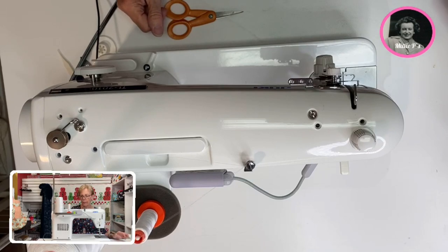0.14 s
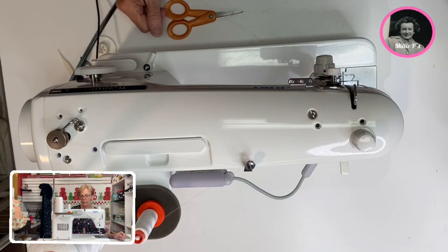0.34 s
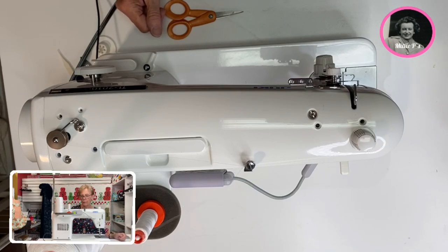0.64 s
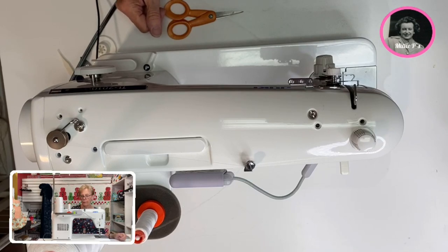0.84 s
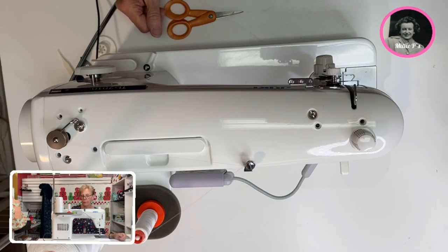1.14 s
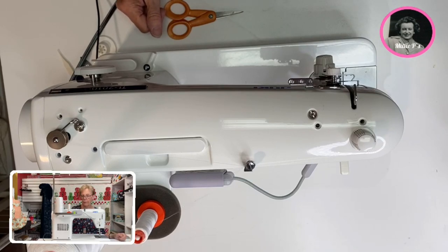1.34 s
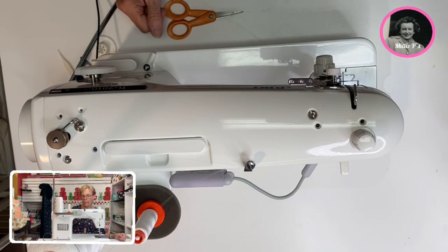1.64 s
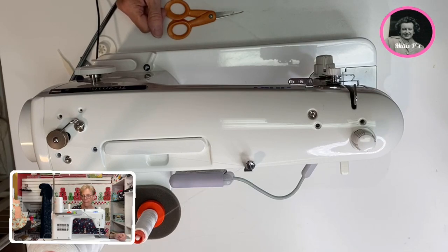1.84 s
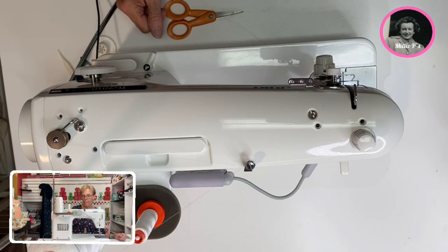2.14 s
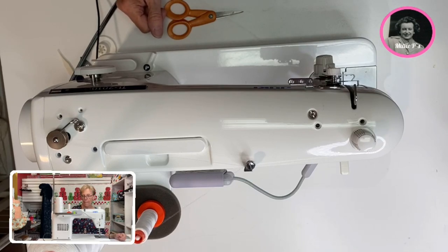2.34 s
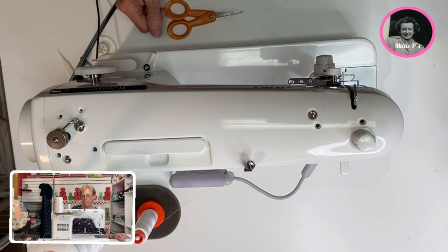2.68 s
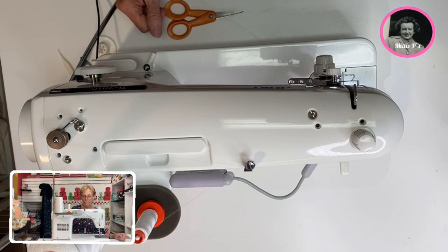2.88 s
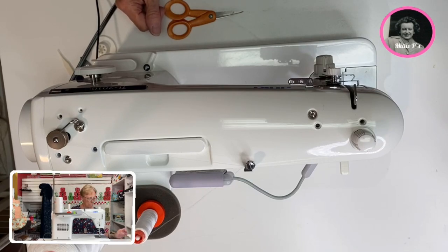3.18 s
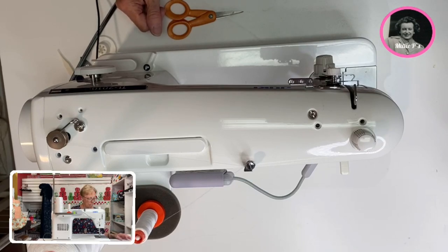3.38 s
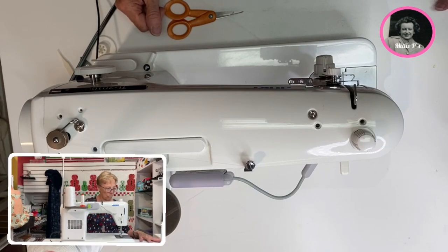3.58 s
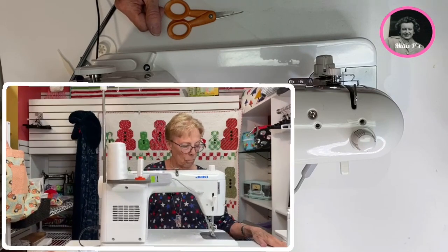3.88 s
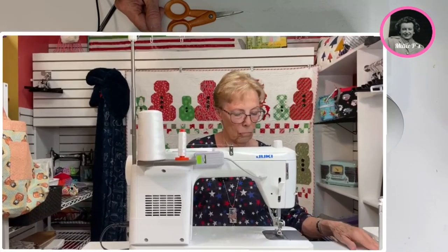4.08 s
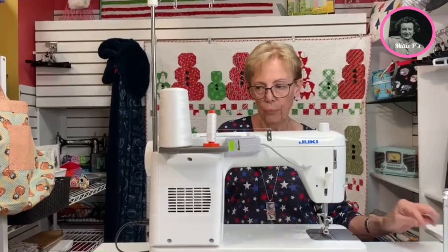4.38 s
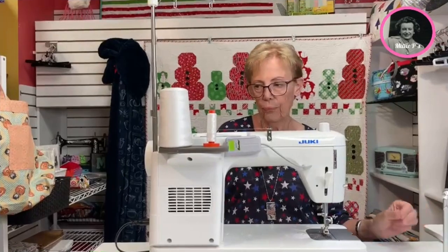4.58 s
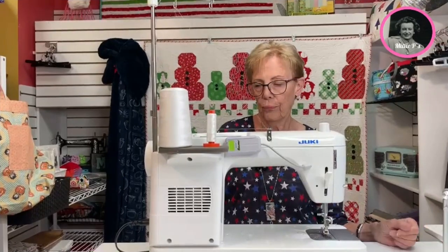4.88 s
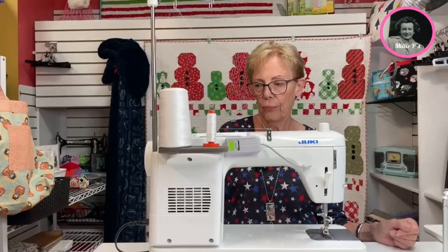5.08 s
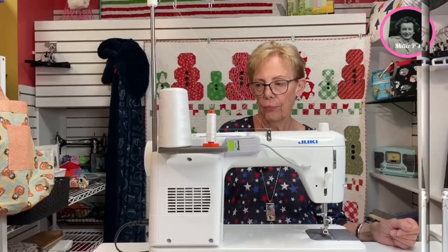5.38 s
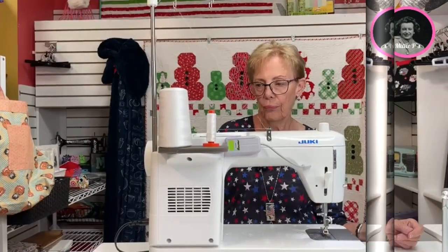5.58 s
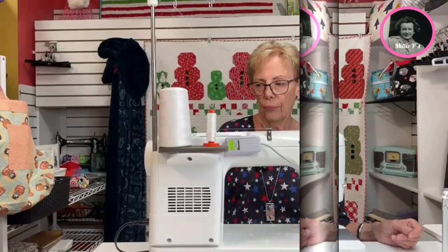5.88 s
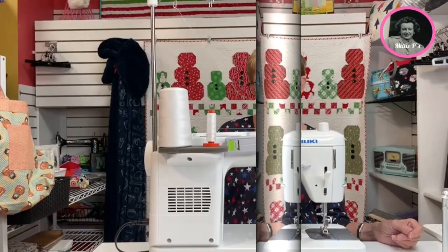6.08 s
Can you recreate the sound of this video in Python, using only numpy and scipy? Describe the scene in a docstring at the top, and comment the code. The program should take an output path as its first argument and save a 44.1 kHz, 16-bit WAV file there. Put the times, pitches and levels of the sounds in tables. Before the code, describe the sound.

Steady, nearly pure motor whine with a rough buzzing edge, fast bobbin chatter and thin scraping squeals, dipping in level at the very end.

```python
"""A sewing machine motor settles to a steady speed, its 13 pulley teeth whining, and spins a bobbin winder.
The whine is a sine; wheel and belt add side tones, stored as one wave that repeats with their full cycle.
A loose bobbin knocks on every turn: short blows make the shell ring, and bursts of noise chirp and scrape.
Shaped noise makes the whirr, the thin squeals and the low rumble; a slow sine swell makes the hum.
The whine drops at the very end; side tones, whirr, bobbin and rumble sink a little over the last second."""
import sys
import numpy as np
from scipy import signal
from scipy.fft import rfft, irfft
from scipy.io import wavfile
from scipy.ndimage import uniform_filter1d, map_coordinates

SR = 44100
rng = np.random.default_rng(int(sys.argv[2]) if len(sys.argv) > 2 else 0)


def log_audio(samples):
    """Write samples as a 16-bit WAV file to the path given in sys.argv[1]."""
    # one column per channel
    frames = np.atleast_2d(samples).T
    # limit to full scale, then quantise
    limited = np.clip(frames, -1, 1)
    pcm = np.round(limited * 32767).astype(np.int16)
    wavfile.write(sys.argv[1], SR, pcm)


N = 274346  # samples, about 6.2 s

TEETH = 13  # on the motor pulley
CYCLE = 42  # motor turns until wheel and belt are back in step
WHEEL, BELT = 7, 5  # their turns in one full cycle
MESH = TEETH * CYCLE  # teeth passing in one full cycle
STEADY_PER_S = 144.222  # motor turns per second once settled

# resonances of the machine's shell:
# (frequency [Hz], width [Hz], lift of the whirr [dB], relative strength of the ring to a knock [dB])
SHELL = [(218.4, 44, 16, -24), (340.5, 25, 8.5, -15.5), (660, 217, 13, -41), (982, 43, 16.5, -28),
         (1238, 33, 1, 0), (1464, 118, 12, -18), (1910, 293, 13.5, -37), (2104, 64, -1, -7),
         (2906, 107, 4.5, -2), (3422, 220, 6.5, -3), (3840, 400, -9, -2.5), (4790, 340, -1, -7.5),
         (5240, 210, -24, -10.5), (6630, 190, 2, -11.5), (7600, 190, 2, -52), (8410, 87, 4.5, -20),
         (9000, 150, 1, -25), (10400, 140, -19, -38), (12040, 400, 3, -35), (13000, 300, -7, -13),
         (15000, 350, -4, -26)]


def gain_of(db):
    """Turns decibels into a factor for the wave."""
    return 10 ** (np.asarray(db) / 20)


def evened(x):
    """Scales a signal to an rms (average strength) of 1."""
    return x / np.sqrt(np.mean(x ** 2) + 1e-20)


def smoothed_twice(x, size):
    """Applies a moving average of `size` samples two times."""
    return uniform_filter1d(uniform_filter1d(x, size=size), size=size)


def curve(rows):
    """Draws straight lines through a (time, value) table, one value a sample."""
    time_s, values = np.transpose(rows)
    return np.interp(np.arange(N) / SR, time_s, values)


def resonate(x, hz, width_hz):
    """Rings at one frequency: shifts it down to zero, smooths, and shifts it back."""
    turn = np.exp(2j * np.pi * np.cumsum(hz * np.ones(len(x))) / SR)
    r = np.exp(-np.pi * abs(width_hz) / SR)
    return 2 * (turn * signal.lfilter([1 - r], [1, -r], x / turn)).real


def resonate_twice(x, hz, width_hz):
    """Rings twice in a row, which cuts away more of the sound on both sides, then evens the strength."""
    return evened(resonate(resonate(x, hz, width_hz), hz, width_hz))


def speed():
    """Motor turns per second, easing down to the steady value."""
    extra_per_s, settle_s = 1.4, .45
    left = np.clip(1 - np.arange(N) / SR / settle_s, 0, 1)
    return STEADY_PER_S + extra_per_s * left ** 2


def fade_db():
    """A level that sinks evenly, in dB, over the last second or so."""
    from_s, db_per_s = 5.17, 2.5
    return -db_per_s * np.maximum(np.arange(N) / SR - from_s, 0)


def in_spell(outside_db, inside_db):
    """Gain that moves between two levels with the bobbin's bright spell, blended as power."""
    # how far the spell has come: (time [s], share [0 to 1])
    spell = [(0, 0), (2.6, 0), (3.0, 0.2), (3.3, 1), (3.65, 1), (3.95, 1), (4.2, 0.5), (4.55, 0),
             (6.22, 0.02)]
    share = np.clip(curve(spell), 0, 1)
    return np.sqrt((1 - share) * gain_of(2 * outside_db) + share * gain_of(2 * inside_db))


def shell_colour(hz):
    """Strength of the whirr at each frequency, lifted at every resonance of the shell."""
    # whirr of bearings, belt and air: (frequency [Hz], relative level [dB])
    whirr_levels = [(41, -51), (70, -12.5), (148, -19), (189, -15.5), (786, -27.5), (1240, -12),
                    (1350, -22), (1620, -18), (2330, -17), (3820, -13.5), (4380, -21.5), (15500, -38.5)]
    f, db = np.transpose(whirr_levels)
    base = gain_of(np.interp(np.log(hz + 1), np.log(f + 1), db, left=-80))
    lift = sum(gain_of(up_db) / (1 + (2 * (hz - mid) / width) ** 2) for mid, width, up_db, _ in SHELL)
    return base * (1 + lift)


def rumble(level_db=-38):
    """Slow, lumpy low noise through table and floor: random noise shaped by frequency."""
    # shape of the rumble: (frequency [Hz], relative level [dB])
    rumble_levels = [(4, -17), (9, 1), (26, -9), (33, -13.5), (60, -13), (90, -31.5), (140, -54)]
    hz = np.fft.rfftfreq(N, 1 / SR)
    f, db = np.transpose(rumble_levels)
    colour = gain_of(np.interp(np.log(hz + 1), np.log(f + 1), db, right=-120))
    noise = irfft(rfft(rng.standard_normal(N)) * colour, N)
    return gain_of(level_db + fade_db()) * evened(noise)


def hum(hz=58.5, middle_db=-50.5, swell_db=5, period_s=7.6, top_s=5.0):
    """One low sine tone that grows and sinks slowly, loudest at top_s."""
    t = np.arange(N) / SR
    db = middle_db + swell_db * np.cos(2 * np.pi * (t - top_s) / period_s)
    return gain_of(db) * np.sqrt(2) * np.sin(2 * np.pi * hz * t)


def whirr(level_db=-40, patchy_db=1.5, belt_db=0.5, wheel_db=1.3):
    """Noise through the shell, with drifting patches, throbbing as belt and wheel go round."""
    frames, hz = N // 512 + 5, np.fft.rfftfreq(2048, 1 / SR)
    real, imaginary, patches = rng.standard_normal((frames, len(hz), 3)).T
    # patches spread over neighbouring frequencies, then over time
    patches = uniform_filter1d(patches, size=30, axis=0)
    patches = evened(uniform_filter1d(patches, size=12, axis=1))
    spectrum = (real + 1j * imaginary) * shell_colour(hz)[:, None] * gain_of(patchy_db * patches)
    noise = signal.istft(spectrum, nperseg=2048, noverlap=1536)[1][:N]
    cycle_angle = 2 * np.pi * np.cumsum(speed()) / SR / CYCLE
    throb_db = belt_db * np.cos(BELT * cycle_angle) + wheel_db * np.cos(WHEEL * cycle_angle)
    return gain_of(level_db + fade_db() + throb_db) * evened(noise)


def squeal(gust_db=2.3, drift_db=1.5, ease_s=1.4):
    """Narrow rings fed by friction that comes and goes within hundredths of a second and drifts over tenths."""
    # thin squeals from the winder wheel: (frequency [Hz], width of each ringing filter [Hz],
    # extra level at the start [dB], level outside the bright spell [dB], level inside it [dB])
    squeals = [(5523, 355, -1, -57.5, -77), (8530, 79, 3, -71, -60.5), (9255, 140, 6.5, -66, -60.5),
               (10200, 84, 4, -72.5, -64)]
    gusts, drift = (evened(smoothed_twice(rng.standard_normal((len(squeals), N)), size))
                    for size in (500, 4000))
    rubs = rng.standard_normal(gusts.shape) * gain_of(gust_db * gusts + drift_db * drift)
    early = np.exp(-np.arange(N) / SR / ease_s)  # the extra level dies away
    total = np.zeros(N)
    for rub, (hz, width_hz, start_db, outside_db, inside_db) in zip(rubs, squeals):
        gain = gain_of(start_db * early) * in_spell(outside_db, inside_db)
        total += gain * resonate_twice(rub, hz, width_hz)
    return total


def bobbin_blows(turns_per_s=45.8, run_db=1.5, jitter_ms=.2):
    """Each turn the loose bobbin strikes its spindle a few times: one spike a blow, sized by its force."""
    # how far the main knock falls behind an even beat: (time [s], lag [ms])
    lag = [(0, 24.8), (.8, 24.4), (1.2, 20.5), (2.802, 16.7), (4.399, 15), (6.22, 20.7)]
    # contacts in one turn: (time from the main knock [ms], relative level [dB], scatter [dB])
    contacts = [(0, 1, 1.3), (-4.5, -6, 3), (-7.5, -7, 3.5), (2, -6, 3.5)]
    beat = np.arange(-1, int(N / SR * turns_per_s) + 1) / turns_per_s
    time_s, lag_ms = np.transpose(lag)
    main = beat + np.interp(beat, time_s, lag_ms) / 1000
    chance = rng.standard_normal((len(beat), len(contacts), 2))
    shift_ms, db, scatter_db = np.transpose(contacts)
    at = (main[:, None] + (shift_ms + jitter_ms * chance[..., 0]) / 1000) * SR
    # harder and softer knocks come in runs of a few turns
    runs = evened(uniform_filter1d(rng.standard_normal(len(beat)), size=4))[:, None]
    force = gain_of(db + scatter_db * np.clip(chance[..., 1], -2, 1.3) + run_db * runs)
    inside = (at >= 0) & (at < N)
    return np.bincount(at[inside].astype(int), force[inside], N)


def bobbin(drag_ms=1.2, rub=0.46, widen=1.33, bright_hz=2500):
    """Blows make the shell ring and die away; each contact also drags, and the thin flange chirps."""
    # chirps of the flange: (frequency [Hz], width of each ringing filter [Hz],
    # level outside the bright spell [dB], level inside it [dB])
    flange_chirps = [(6700, 990, -60, -60.5), (8150, 1000, -73, -54.5)]
    blows = bobbin_blows()
    t = np.arange(2048) / SR
    # widen makes the rings die faster than the shell's widths alone would
    rings = np.array([gain_of(hit_db) * np.exp(-np.pi * widen * width * t) * np.sin(2 * np.pi * f * t)
                      for f, width, _, hit_db in SHELL])
    high = np.transpose(SHELL)[0] > bright_hz
    dull, sharp = (signal.oaconvolve(blows, rings[part].sum(0))[:N] for part in (~high, high))
    knocks = in_spell(-43.5, -43.5) * evened(dull + in_spell(1, -2) * sharp)
    # every contact drags briefly: bursts of noise; the scrape also rubs steadily
    bursts = signal.oaconvolve(blows, np.exp(-t * 1000 / abs(drag_ms)))[:N]
    drag = bursts * rng.standard_normal(N)
    rubbed = drag + rub * rng.standard_normal(N)
    chirps = sum(in_spell(outside_db, inside_db) * resonate_twice(drag, hz, width_hz)
                 for hz, width_hz, outside_db, inside_db in flange_chirps)
    scrape = in_spell(-65, -60.5) * resonate_twice(rubbed, 11900, 2500)
    return gain_of(fade_db()) * (knocks + chirps + scrape)


def side_tones():
    """Levels in dB, before the fade, of all drive tones but the whine, by vibrations per full cycle."""
    # multiples of the motor turn (13 = the whine, 26 and 39 = its overtones): (multiple)
    motor_orders = [1, 3, 4, 5, 6, 7, 10, 11, 12, 14, 15, 16, 17, 18, 19, 25, 26, 27, 28, 29, 38, 39]
    # one for each motor multiple: (level [dB])
    motor_db = [-42.5, -57.5, -62, -62.5, -66, -56, -57.5, -56.5, -50.5, -48.5, -49, -66, -69, -63, -62,
                -67.5, -50, -54, -57, -62, -64.5, -65.5]
    # side tones one and two wheel turns from a motor tone, against it: (below [dB], above [dB])
    wheel_side_db = [(-10.5, -9), (-16.5, -13.5)]
    # low tones at multiples of the wheel turn: (multiple)
    wheel_orders = [5, 10, 15, 23, 25, 41, 62, 68]
    # one for each wheel multiple: (level [dB])
    wheel_db = [-62, -55, -63, -55.5, -68.5, -66.5, -61, -58.5]
    # side tones 1 and 2 wheel turns from the whine: (level below [dB], level above [dB])
    whine_wheel = [(-49.5, -47), (-57, -66)]
    # side tones 1, 2, 3 .. belt turns from the whine: (level below [dB], level above [dB])
    whine_belt = [(-54, -50.5), (-67, -51.5), (-47.5, -77.5), (-54, -75), (-83, -66), (-54, -70),
                  (-57, -80), (-53, -63), (-60, -66)]
    tones = {}  # where two tones meet, the later one counts
    # belt side tones of the first overtone lose 1.2 dB with each further belt turn
    for step in range(1, len(whine_belt) + 1):
        for side, nearest_db in zip((-1, 1), (-63, -58.5)):
            tones[2 * MESH + side * step * BELT] = nearest_db - 1.2 * (step - 1)
    for turns, db in zip(motor_orders, motor_db):
        middle = turns * CYCLE
        tones[middle] = db
        if turns > TEETH - 2:  # lower motor tones have no wheel side tones
            for step, (below_db, above_db) in enumerate(wheel_side_db, 1):
                tones[middle - step * WHEEL] = db + below_db
                tones[middle + step * WHEEL] = db + above_db
    tones.update({turns * WHEEL: db for turns, db in zip(wheel_orders, wheel_db)})
    for spacing, rows in ((WHEEL, whine_wheel), (BELT, whine_belt)):
        for step, (below_db, above_db) in enumerate(rows, 1):
            tones[MESH - step * spacing] = below_db
            tones[MESH + step * spacing] = above_db
    return tones


def cycle_pattern(repeat_db, top_hz, size=2 ** 15, wheel_swell=.5):
    """One full cycle of the drive as a wave: side tones plus a faint rough pattern, without the whine."""
    # wobble around zero, the whine and its two overtones: (share [0 = level swells, 1 = pitch bends])
    bend_shares = [1, 1, .75, .5]
    order = np.arange(size // 2 + 1)  # vibrations per full cycle
    hz = order * STEADY_PER_S / CYCLE
    rough = shell_colour(hz) * rng.rayleigh(1, len(hz)) * (hz > 150) / (1 + (hz / top_hz) ** 4)
    heights = gain_of(repeat_db) * rough / np.linalg.norm(rough)
    levels = side_tones()
    heights[np.array(list(levels), int)] = gain_of(list(levels.values()))
    heights[MESH] = 0  # the whine is added separately
    # side tones come from wobble: a pair around a tooth tone bends its pitch or swells its level
    nearest = np.round(order / MESH).astype(int)
    apart = order - MESH * nearest
    angle = 2 * np.pi * rng.random(MESH)
    # one bump on the belt keeps its nearest side tones in step, so they pulse once a belt turn
    angle[BELT:5 * BELT:BELT] = angle[BELT] * np.arange(1, 5)
    # the out-of-round wheel leans further to level swells
    from_wheel = (apart % WHEEL == 0) * (apart % CYCLE != 0)
    bend = np.take(bend_shares, nearest, mode="clip") - wheel_swell * from_wheel
    phase = np.sign(apart) * angle[abs(apart)] + np.pi / 2 * bend * (apart != 0)
    return irfft(heights * np.exp(1j * phase)) * size / np.sqrt(2)


def drive_train(repeat_db=-48, top_hz=6000, flutter_rad=0.18):
    """Pulley teeth whine as they pass; the wave of side tones is read out again with every full cycle."""
    # tooth whine, swelling slowly: (time [s], level [dB])
    whine_levels = [(0.0, -31.5), (0.15, -33), (2.29, -30), (4.3, -33), (4.94, -30), (5.67, -31),
                    (6.08, -36.5), (6.22, -42)]
    # uneven tooth load makes the shaft angle flutter a little; flutter_rad counts in whine phase
    shake = evened(smoothed_twice(rng.standard_normal(N), 3000))
    turns = np.cumsum(speed()) / SR + flutter_rad * shake / (2 * np.pi * TEETH)
    pattern = cycle_pattern(repeat_db, top_hz)
    place = turns / CYCLE % 1 * len(pattern)
    tones = map_coordinates(pattern, [place], order=3, mode="grid-wrap")
    whine = gain_of(curve(whine_levels)) * np.sqrt(2) * np.cos(2 * np.pi * TEETH * turns)
    return whine + tones * gain_of(fade_db())


def scene():
    """Adds all sources into one channel."""
    return (rumble() + hum() + whirr() + squeal() + bobbin() + drive_train())[None]


def record(dry):
    """Cuts away the sound above an upper edge with a steep filter."""
    edge_hz = 15680
    low_pass = signal.firwin(1023, edge_hz, window=("kaiser", 9), fs=SR)
    return signal.oaconvolve(dry, low_pass[None], "same")


dry = scene()
out = record(dry)
log_audio(out)
```